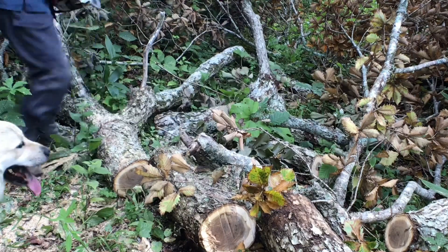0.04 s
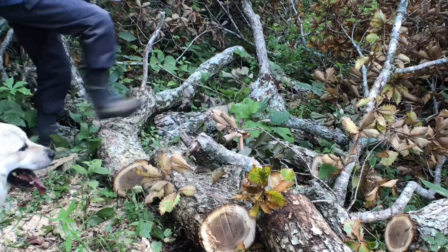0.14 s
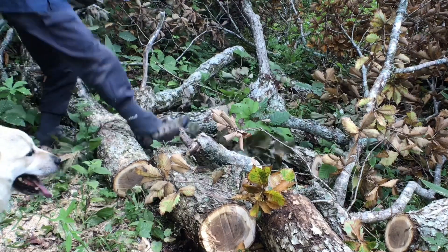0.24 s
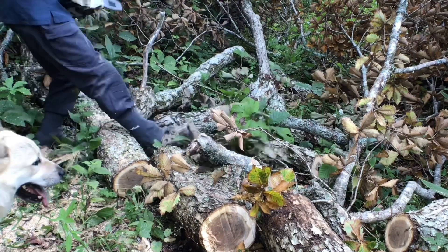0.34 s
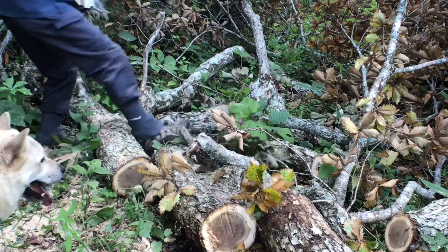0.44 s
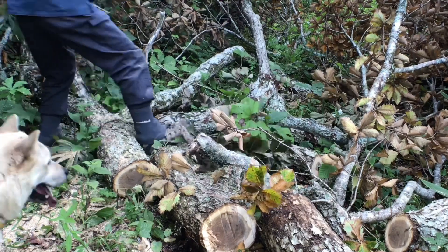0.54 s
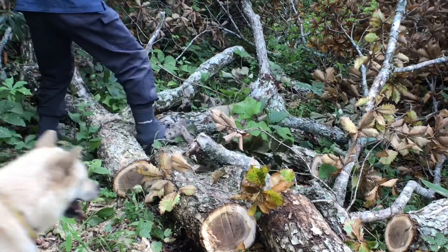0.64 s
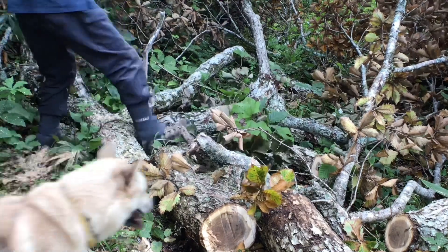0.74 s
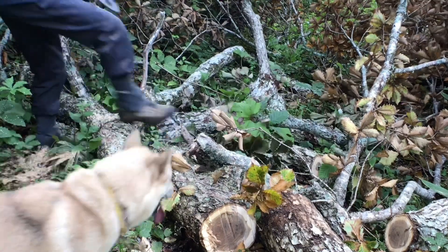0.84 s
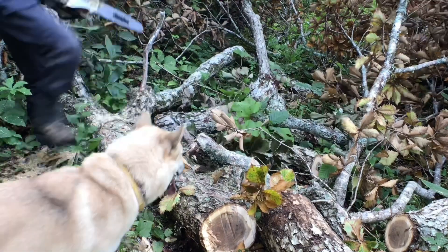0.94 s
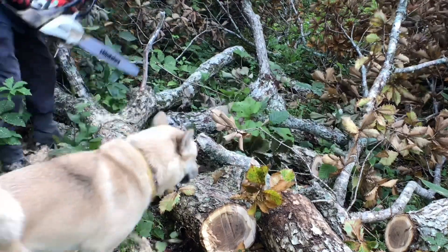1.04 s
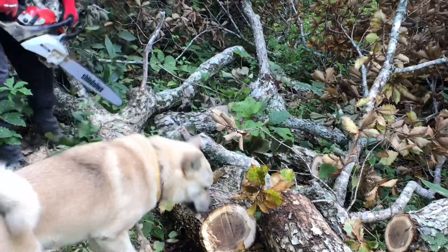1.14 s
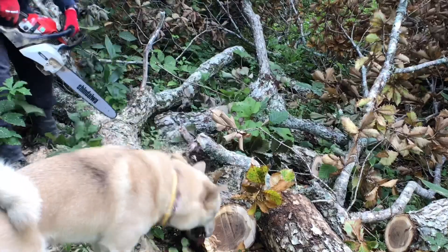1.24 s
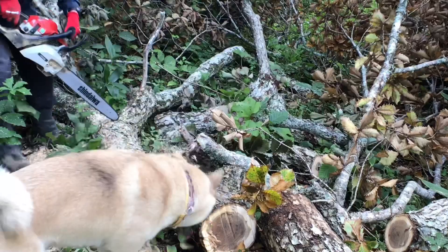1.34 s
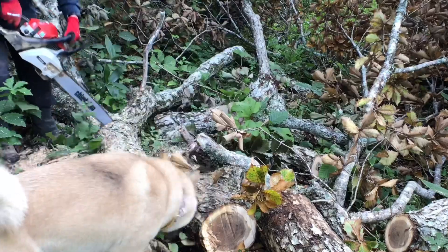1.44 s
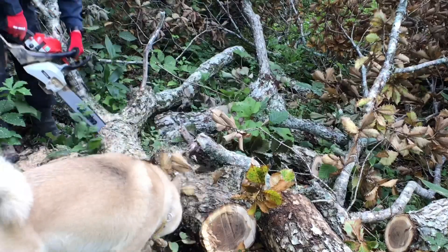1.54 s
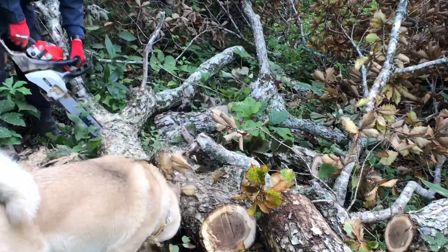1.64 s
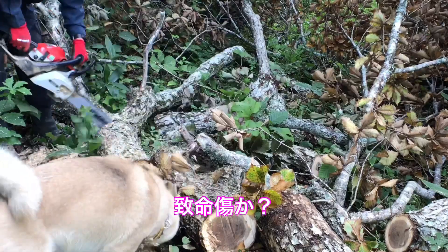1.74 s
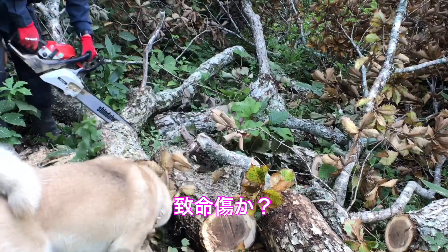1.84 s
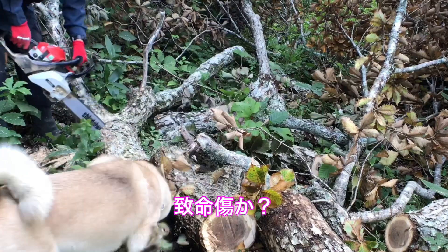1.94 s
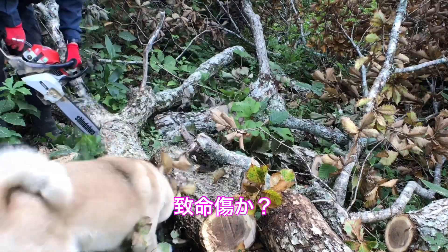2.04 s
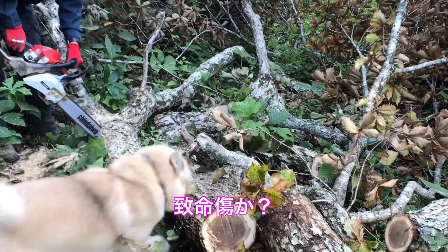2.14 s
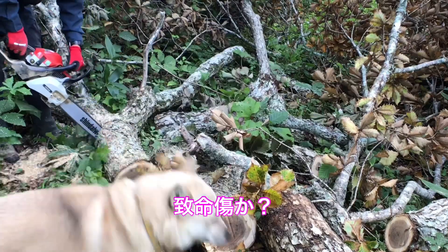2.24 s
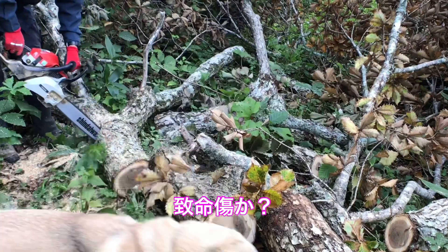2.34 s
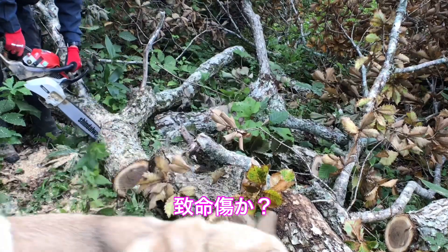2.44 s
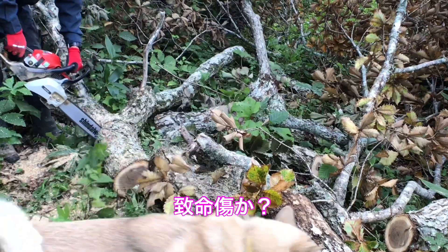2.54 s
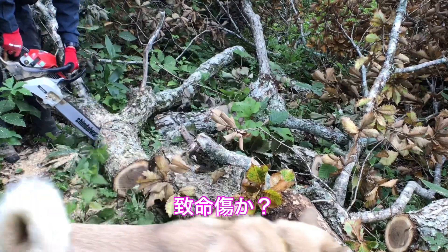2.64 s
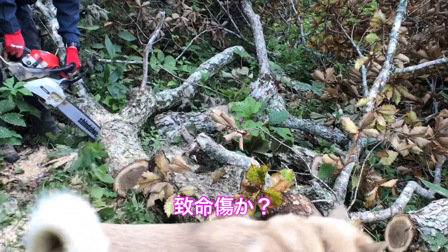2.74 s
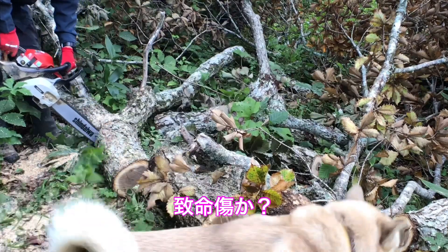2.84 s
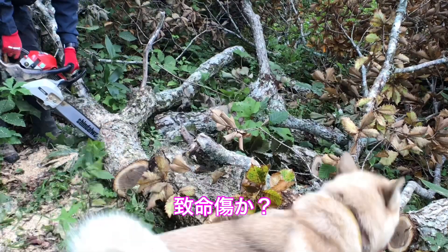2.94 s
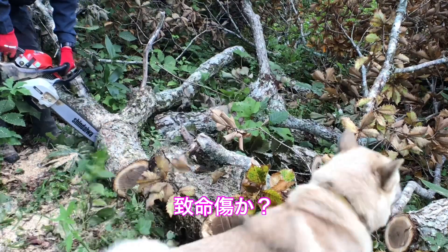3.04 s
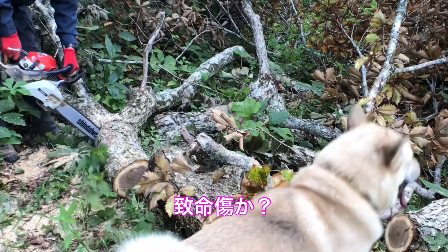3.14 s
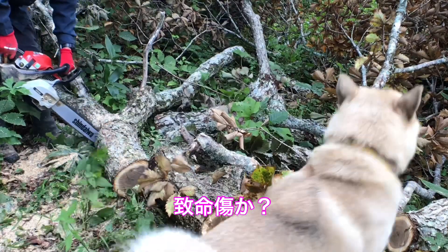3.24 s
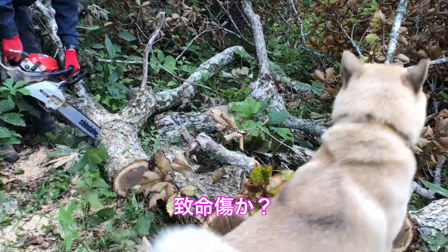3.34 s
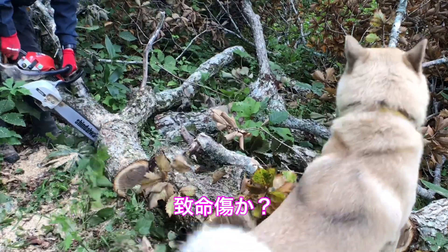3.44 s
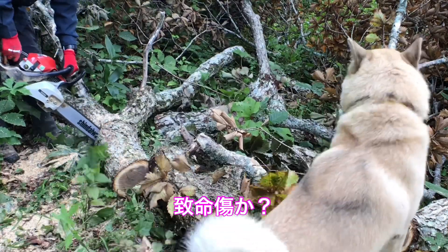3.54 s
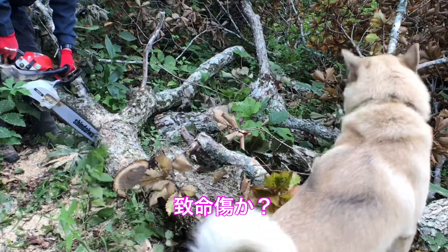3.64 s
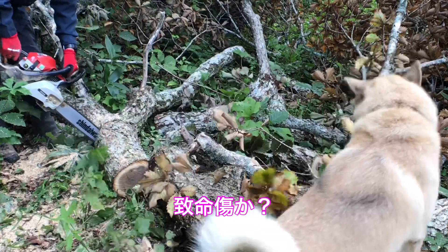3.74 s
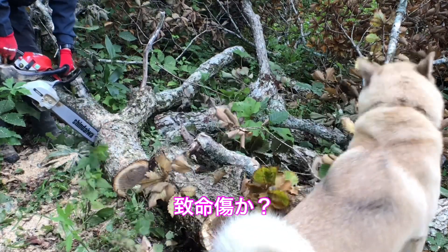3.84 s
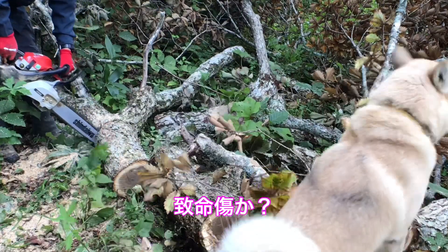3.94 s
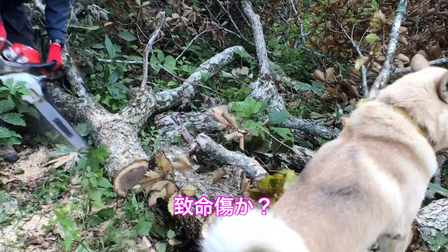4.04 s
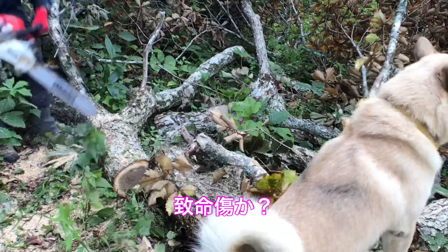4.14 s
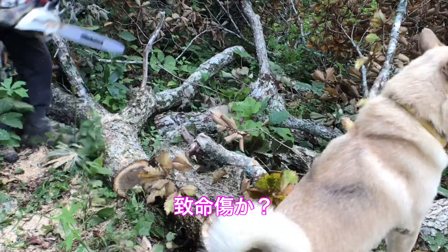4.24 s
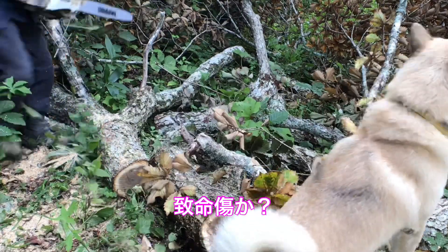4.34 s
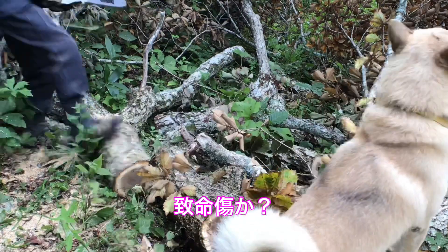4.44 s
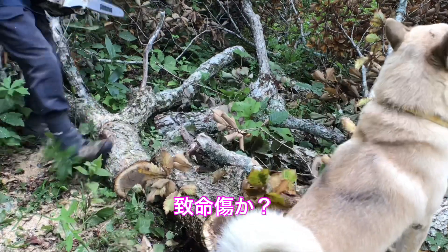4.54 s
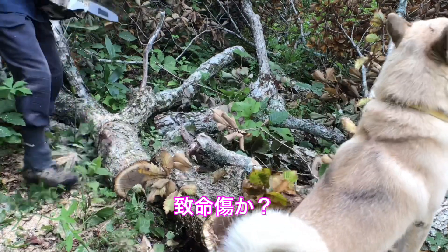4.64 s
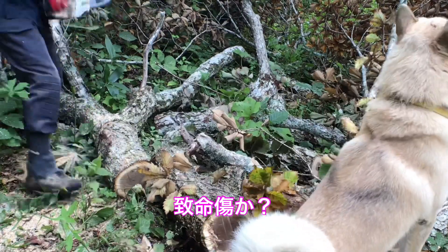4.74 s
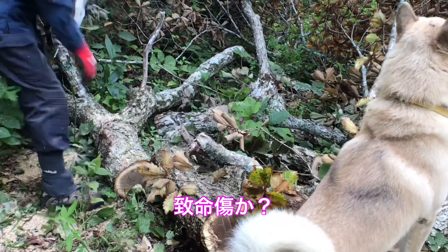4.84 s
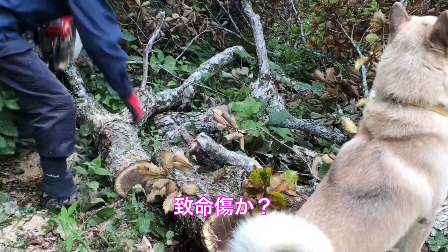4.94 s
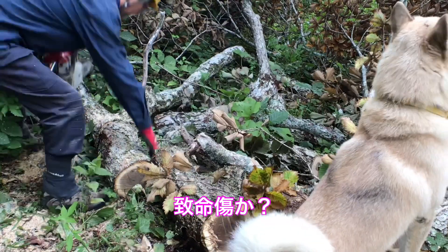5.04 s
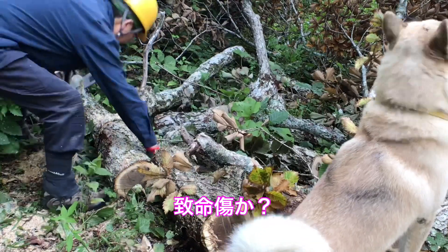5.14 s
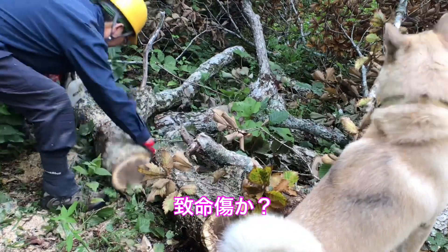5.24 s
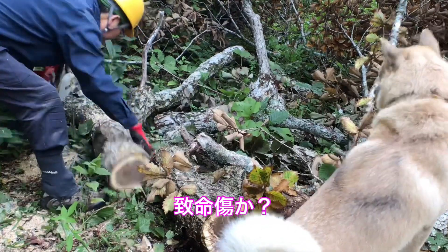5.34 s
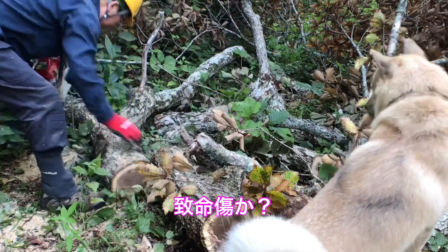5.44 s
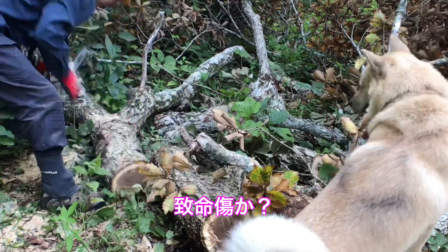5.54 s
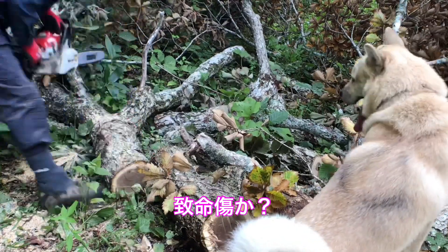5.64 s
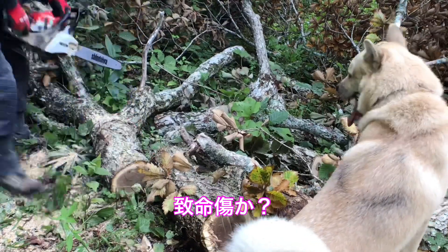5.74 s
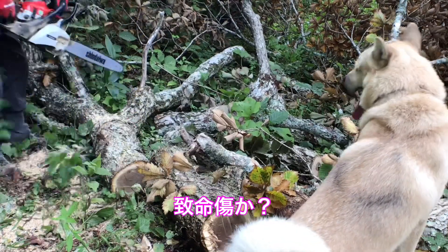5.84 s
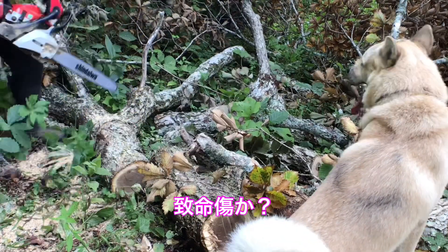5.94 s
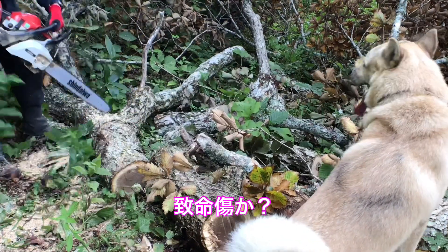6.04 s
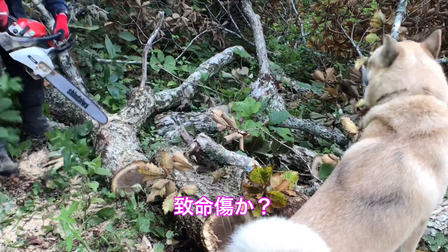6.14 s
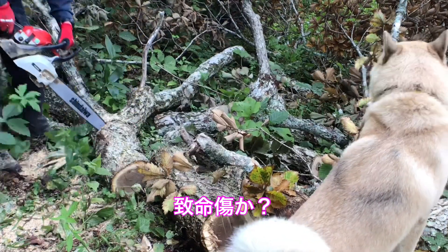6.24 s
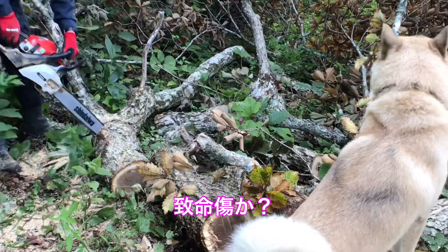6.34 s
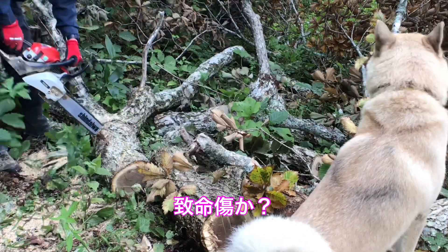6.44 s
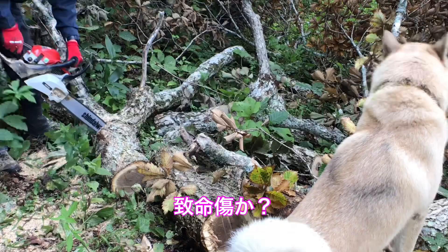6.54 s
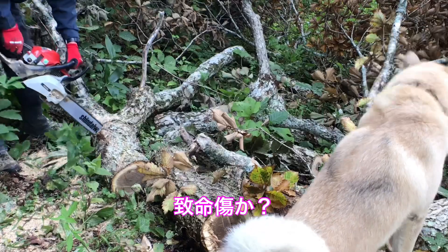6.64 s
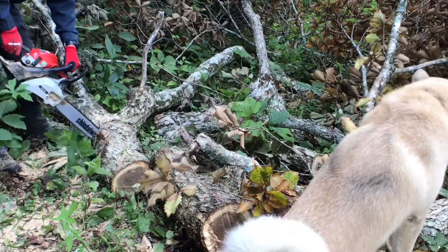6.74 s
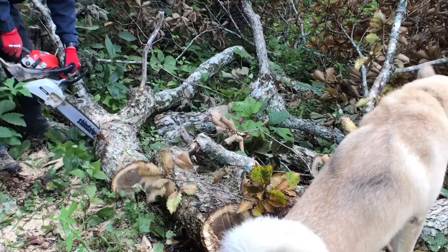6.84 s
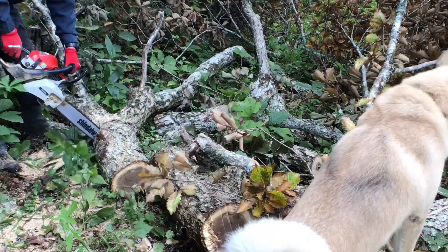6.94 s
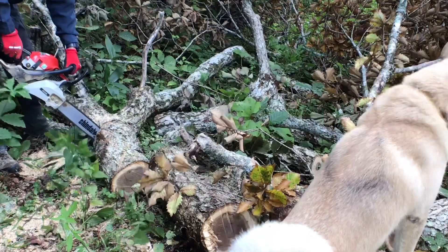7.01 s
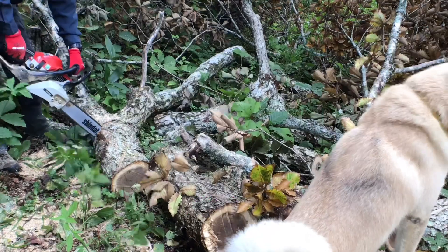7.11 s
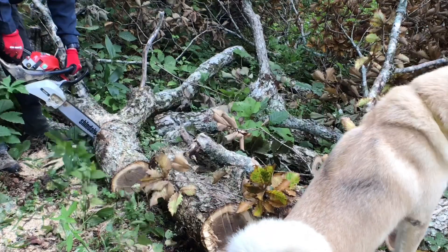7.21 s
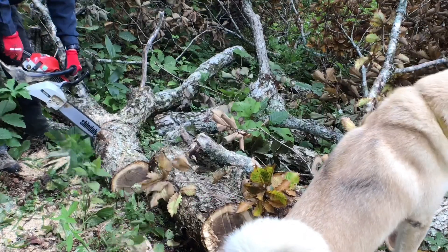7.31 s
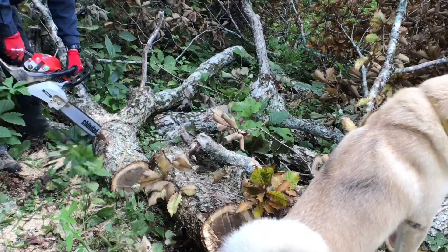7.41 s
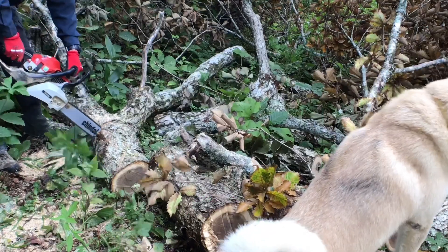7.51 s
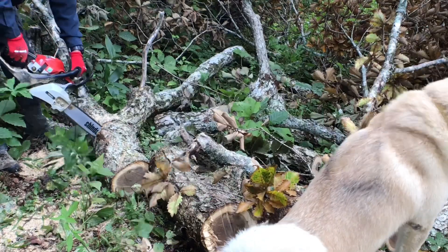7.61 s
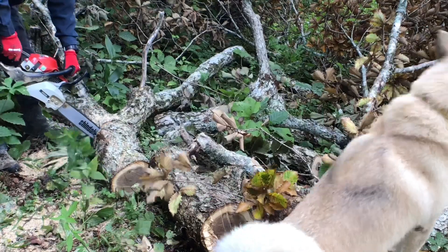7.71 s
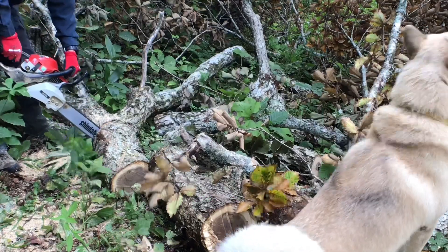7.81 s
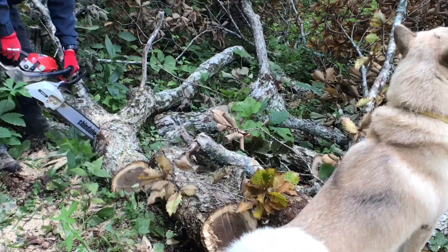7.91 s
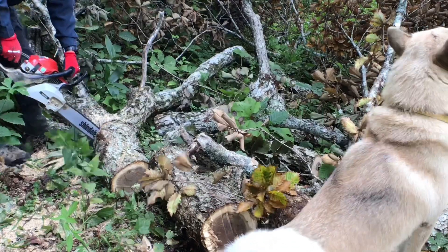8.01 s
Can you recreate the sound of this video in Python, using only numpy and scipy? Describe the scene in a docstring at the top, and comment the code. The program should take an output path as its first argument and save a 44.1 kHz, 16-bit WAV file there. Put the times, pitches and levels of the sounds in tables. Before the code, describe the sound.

A two-stroke chainsaw works outdoors a few metres from the microphone, everything about twice normal speed. From 0 to 1.7 s it idles in a rapid, uneven putter of pops and softer puffs, with rasp, metallic ring and slack chain rattle; the tone dulls and brightens as the saw is moved. At 1.7 s it opens up, whining briefly as it climbs to full speed by 2.1 s. Until about 4.2 s it holds a loud, buzzing scream with a rough growl beneath, pitch sagging and stumbling slightly under load. Released, it coasts smoothly down, reaching idle near 4.8 s. A muffled, lumpy putter follows, with sharper pops from about 5.2 s and brighter around 6.1 s. At 6.5 s it revs again, reaching a full growling scream by 6.85 s and holding it to the end around 8 s. Dry, centred sound with little deep bass.

```python
"""Chainsaw among felled logs

In a wood, a few metres from the microphone, one channel doubled; it all runs at about double speed.
A two-stroke saw idles with uneven pops, is opened up to cut, coasts down, idles and is opened up again.
Flat out, every third firing is the hard one, bar a few stumbles, which puts a growl under the scream.
One crank times exhaust pulses, a sine drone and whine, and filtered noise for rasp, ring and chain."""
import sys
import numpy as np
from scipy import signal
from scipy.fft import rfft, irfft
from scipy.io import wavfile
from scipy.ndimage import uniform_filter1d

SR = 44100
rng = np.random.default_rng(int(sys.argv[2]) if len(sys.argv) > 2 else 0)


def wav_out(sig):
    """Save sig, one row per channel (or a flat mono array), as 16-bit PCM at SR to the path in sys.argv[1]."""
    wavfile.write(sys.argv[1], SR, np.round(np.clip(np.atleast_2d(sig).T, -1, 1) * 32767).astype(np.int16))


N = 355887
T = np.arange(N) / SR  # t/s of every sample


def from_db(db):
    """Decibels to gain."""
    return 10 ** (np.asarray(db) / 20)


def in_time(rows):
    """One curve per column after t/s, its rows joined by straight lines."""
    t_s, *columns = np.transpose(rows)
    return [np.interp(T, t_s, column) for column in columns]


def ease(x, start, end):
    """Smooth step from 0 at start to 1 at end."""
    u = np.clip((x - start) / (end - start), 0, 1)
    return u * u * (3 - 2 * u)


def drift(per_s):
    """Slow chance with a spread near 1: random points joined by straight lines."""
    return np.interp(T * per_s, np.arange(N), rng.standard_normal(N))


def below(x, hz):
    """The part of x under a frequency, without delay."""
    return signal.sosfiltfilt(signal.butter(3, hz, fs=SR, output="sos"), x)


def coloured(x, spectrum, size=4096):
    """Causal (minimum-phase) filter with the given spectrum, built by folding its cepstrum."""
    hz, db = np.transpose(spectrum)
    bins_hz = np.fft.rfftfreq(size, 1 / SR)
    gain_db = np.interp(np.log(bins_hz + 1), np.log(hz), db)
    cepstrum = irfft(np.log(from_db(gain_db)))
    cepstrum[1:size // 2] *= 2
    cepstrum[size // 2 + 1:] = 0
    response = irfft(np.exp(rfft(cepstrum)))
    return signal.fftconvolve(x, response)[:N]


def resonance(x, hz, width_hz):
    """Two-pole resonance with gain 1 on top."""
    r = np.exp(-np.pi * width_hz / SR)
    zeros = np.array([1, 0, -1]) * (1 - r * r) / 2
    poles = [1, -2 * r * np.cos(2 * np.pi * hz / SR), r * r]
    return signal.lfilter(zeros, poles, x)


def at_level(x, db, band, size=3000):
    """Make the slow level of x within a band follow a dB curve."""
    in_band = signal.sosfilt(signal.butter(4, band, "band", fs=SR, output="sos"), x)
    slow_power = uniform_filter1d(uniform_filter1d(in_band ** 2, size), size)
    return x * from_db(db) / np.sqrt(np.abs(slow_power) + 1e-14)


def clicks(times, heights):
    """Band-limited clicks that may fall between samples."""
    at = times[:, None] * SR
    taps = np.floor(at).astype(int) + np.arange(-7, 9)
    shape = np.sinc(taps - at) * np.sinc((taps - at) / 8)
    return np.bincount(np.clip(taps, 0, N - 1).ravel(), (heights[:, None] * shape).ravel(), N)


def bursts(turns, peak_turn, depth_db, flicker_db):
    """Noise that swells once in each revolution, never twice alike."""
    swell_db = depth_db * np.cos(2 * np.pi * (turns - peak_turn))
    return rng.standard_normal(N) * from_db(swell_db + flicker_db * drift(220))


# each squeeze of the trigger: (opens t/s, clutch grips t/s, speed limit reached t/s, released t/s)
REVS = [(1.69, 1.77, 2.115, 4.18), (6.497, 6.555, 6.845, 8.2)]
# idle speed: (t/s, revolutions per s)
IDLE_SPEED = [(0, 103), (.35, 99.4), (.5, 97), (.8, 101.5), (1.05, 93), (1.3, 99), (1.5, 97), (1.62, 90),
              (1.7, 96), (4.8, 100), (4.95, 89.7), (5.35, 100), (6.0, 95.5), (6.12, 104), (6.5, 103)]
# speed flat out, sagging as the chain is pressed into the wood: (t/s, revolutions per s)
FIRST_CUT = [(2.12, 417.6), (2.32, 400.2), (2.64, 407.4), (2.7, 401.6), (2.87, 397.4), (3.05, 403.5),
             (3.36, 400.7), (3.42, 406.8), (3.52, 393.0), (3.59, 410.6), (3.7, 390.9), (3.8, 399.2),
             (3.83, 392.1), (4.17, 396.3)]
SECOND_CUT = [(6.85, 417.0), (6.88, 420.4), (6.96, 406.1), (7.152, 399.3), (7.31, 414.7), (7.442, 399.3),
              (7.524, 407.3), (7.86, 394.8), (8.06, 406.6)]
# the chain bites and loads the engine enough to fire evenly: (from t/s, to t/s)
BITES = [(3.53, 3.59)]
RACE_S, CLUTCH_REV_PER_S = .08, 211.3  # the free engine races up to the speed at which the clutch grips
SHUT_S, COAST_PER_S = 0.025, 2.38  # the throttle snaps shut; friction takes a steady share of the speed
OPEN_S, LIMIT_ONSET_S = 0.054, 0.024  # the throttle opens; the three-beat pattern sets in


def engine_state():
    """Speed, throttle 0-1 and speed limit 0-1: race to the clutch, haul the chain up to speed, cut, coast down."""
    idle, = in_time(IDLE_SPEED)
    flat_out, = in_time(list(FIRST_CUT) + list(SECOND_CUT))
    speed, throttle, limited = idle, np.zeros(N), np.zeros(N)
    for opens, grips, tops, released in REVS:
        race = (CLUTCH_REV_PER_S - idle) * ease(T, opens, opens + RACE_S)
        haul = (flat_out - CLUTCH_REV_PER_S) * ease(T, grips, tops)
        coast = np.exp(-COAST_PER_S * np.maximum(T - released, 0))
        speed = np.maximum(speed, (idle + race + haul) * coast)
        held = 1 - ease(T, released - SHUT_S / 2, released + SHUT_S / 2)
        throttle = throttle + held * ease(T, opens, opens + OPEN_S)
        limited = limited + held * ease(T, tops, tops + LIMIT_ONSET_S)
    for start, end in BITES:
        limited = limited * ((T < start) | (T > end))
    return speed, np.clip(throttle, 0, 1), limited


POP_RISE_S = .0015  # from the start of a pop to its peak


def crank(speed, waver=0.00223):
    """Revolutions turned so far; every loud pop falls on a whole revolution."""
    turns = np.cumsum(speed * (1 + waver * drift(70))) / SR
    pop_s = np.array(LOUD_POPS)[:, 0] + POP_RISE_S
    offset = np.unwrap(np.interp(pop_s, T, turns), period=1)
    return turns - np.interp(T, pop_s, offset)


# the saw is turned and carried behind its user and out again: (t/s, bass level/dB, treble level/dB)
FACING = [(0, -3, -2.5), (.75, -3, -6), (1.02, -1.5, -2.5), (1.26, 2, 1), (1.48, 0.5, 0), (1.63, 1.8, -2),
          (2.1, -1, 1.3), (2.9, -0.1, -0.35), (4.2, 0, -0.1), (4.72, -4.5, 0.4), (4.98, -3.5, -6),
          (5.27, 0.7, -5), (5.66, -1.2, -3), (5.8, -1.5, 1), (6.01, -0.6, -1.5), (6.1, 1.5, 1.5),
          (6.47, 1.5, 1), (6.7, -0.6, 0.7), (8.07, -0.2, -0.45)]
# target level of each part in its own band, before the parts are mixed:
# (level/dB at idle, dB per octave of speed, dB more on open throttle, dB more at the speed limit)
CHUG_LEVEL = (-31, 4, 9, 0)
DRONE_LEVEL = (-33.5, 3, 12.5, -1.53)
THUMP_LEVEL = (-38, 3, 3.5, 1.14)
BARK_LEVEL = (-34.5, 5, 2.35, -0.5)
RASP_LEVEL = (-41, 7, 2, 0.8)
RING_LEVEL = (-37, 2.5, -2, 0.5)
CHAIN_LEVEL = (-47, 7, 1.46, 1.2)
IDLE_REV_PER_S = 97  # the speed from which octaves count
BARK_TREBLE_SHARE, RING_TREBLE_SHARE = 0.7, 1.5  # how much these parts follow the treble
HISS_WAVER_DB, BARK_WAVER_DB, WAVERS_PER_S = 0.65, 1, 12
RING_WAVER_DB, RING_WAVERS_PER_S = 2, 9
PURE_REV_PER_S, PURE_DB = (308, 363), -7  # fast even firing loses its thump over these speeds
# the first firings on open throttle are extra hard, fading over these speeds; share heard in the treble
GULP_DB, GULP_REV_PER_S, GULP_TREBLE_SHARE = 4, (160, 218), 0.97


def loudness(speed, throttle, limited, size=900):
    """Levels in dB of chug, drone, thump, bark, rasp, ring and chain, from engine state and how the saw faces."""
    bass_db, treble_db = in_time(FACING)
    at_limit = uniform_filter1d(limited, size)
    state = np.array([np.ones(N), np.log2(speed / IDLE_REV_PER_S), throttle, at_limit])
    pure = ease(speed, *PURE_REV_PER_S) * throttle * (1 - at_limit)
    gulp_db = GULP_DB * throttle * (1 - ease(speed, *GULP_REV_PER_S))
    treble_db = treble_db + GULP_TREBLE_SHARE * gulp_db + HISS_WAVER_DB * drift(WAVERS_PER_S)
    bark_waver_db = BARK_WAVER_DB * drift(WAVERS_PER_S)
    ring_waver_db = RING_WAVER_DB * drift(RING_WAVERS_PER_S)
    return (np.dot(CHUG_LEVEL, state) + bass_db + gulp_db,
            np.dot(DRONE_LEVEL, state) + bass_db,
            np.dot(THUMP_LEVEL, state) + bass_db + gulp_db + PURE_DB * pure,
            np.dot(BARK_LEVEL, state) + BARK_TREBLE_SHARE * treble_db + bark_waver_db,
            np.dot(RASP_LEVEL, state) + treble_db,
            np.dot(RING_LEVEL, state) + RING_TREBLE_SHARE * treble_db + ring_waver_db,
            np.dot(CHAIN_LEVEL, state) + treble_db)


# colour of the chain hiss: (f/Hz, relative level/dB)
CHAIN = [(2000, -12), (5000, -13), (7000, 7), (7700, 0), (9500, -1.5), (11600, 1.5), (13500, -5),
         (15000, -21), (16000, -58)]
RATTLE_DB = 2.2  # at idle the slack chain rattles unevenly, by this much


def chain_hiss(turns, revved, chain_db):
    """The links hiss as noise swelling with each revolution, rattling unevenly when slack."""
    links = coloured(bursts(turns, peak_turn=-0.17, depth_db=2.0, flicker_db=0.97), CHAIN)
    rattle = from_db(RATTLE_DB * (1 - revved) * drift(300))
    return at_level(links * rattle, chain_db, (7500, 14000))


# the sprocket's whine: (multiple of the crank speed, level/dB)
WHINE_ORDERS = [(7, -36), (8, -24.5)]
WHINE_REV_PER_S, WHINE_WAVER_DB = (250, 320), 0.5  # it sets in over these speeds


def sprocket(turns, speed):
    """The drive sprocket's teeth whine, as sines, while they haul the chain up to the speed limit."""
    hauling, whine = 0, 0
    for _, grips, tops, _ in REVS:
        hauling = hauling + (T > grips) * (1 - ease(T, (grips + tops) / 2, tops) ** 4)
    for multiple, db in WHINE_ORDERS:
        gain = from_db(db + WHINE_WAVER_DB * drift(40))
        whine = whine + gain * np.sin(2 * np.pi * round(multiple) * turns)
    return hauling * ease(speed, *WHINE_REV_PER_S) * whine


# ringing of the clutch drum and bar: (f/Hz, width/Hz, relative level/dB)
METAL = [(5276, 67, 1), (5430, 99, 6), (6780, 40, -2), (8140, 96, -6.5), (8830, 57, -6.5)]


def metal_ring(turns, ring_db):
    """The piston knocks shortly before the port opens and sets the resonant metal ringing."""
    knocks = bursts(turns, peak_turn=-0.2, depth_db=11.0, flicker_db=4.0)
    metal = sum(from_db(db) * resonance(knocks, hz, width) for hz, width, db in METAL)
    return at_level(metal, ring_db, (5100, 5800))


# the housing buzzing with each firing: (f/Hz, relative level/dB)
BUZZ = [(1500, -44), (2400, 10), (2800, -16), (3250, 0.5), (3800, 5.5), (4600, 2.5), (5500, 4.5),
        (6100, 0.5), (6600, -8), (7100, -5), (8000, -27), (14000, -23)]


def housing(kicks, decay_s=0.01, shift=0.87, size=700):
    """Each firing shakes a dense cluster of short modes; their balance shifts as the saw is pressed and turned."""
    responses = rng.standard_normal((2, size)) * np.exp(-T[:size] / decay_s)
    one, other = signal.fftconvolve(kicks[None], responses)[:, :N]
    angle = shift * drift(9)
    return coloured(np.cos(angle) * one + np.sin(angle) * other, BUZZ)


CRACK_SHARE, CRACK_S = 1, 0.0037  # a loud pop lifts the gas rasp: share of its excess in dB, decay


def cracks():
    """Lift in dB of the gas rasp after each loud pop."""
    pop_s, pop_db = np.transpose(LOUD_POPS)
    at = ((pop_s + POP_RISE_S) * SR).astype(int)
    lifts = np.bincount(at, CRACK_SHARE * (pop_db - UNFIRED_DB), N)
    return signal.lfilter([1], [1, -np.exp(-1 / (CRACK_S * SR))], lifts + 1e-18)


# colour of the gas rasp: (f/Hz, relative level/dB)
RASP = [(40, -44), (130, -19.5), (500, -12), (1000, -13.5), (1300, -7), (1750, -1.5), (2700, -1.5),
        (4000, -3.5), (5000, -1.5), (6100, -4.5), (7500, -19), (12000, -33)]


def gas_rasp(turns, revved, rasp_db):
    """Turbulent gas rasps as noise in time with the crank, with a brief crack after each loud pop."""
    noise = bursts(turns, peak_turn=-0.13, depth_db=4.5, flicker_db=0.0)
    gas = coloured(noise * from_db(cracks()), RASP)
    return from_db(-2.0 - 2.35 * revved) * at_level(gas, rasp_db, (2800, 4800))


def gas_drone(turns, revved, drone_db):
    """The muffler smooths the gas flow into a fundamental that dominates at speed."""
    return -revved * from_db(drone_db) * np.cos(2 * np.pi * (turns - .04))


# the loudest pops at idle: (t/s, level/dB among the firings, before contrast and levelling)
LOUD_POPS = [(0.201, -11.5), (0.282, -10), (0.408, -12.5), (0.543, -8), (0.808, -9), (1.154, -12),
             (1.237, -11), (1.276, -11), (1.317, -10.5), (1.357, -11), (1.42, -9), (1.491, -9.5),
             (1.695, -10.5), (5.242, -10), (5.539, -13), (5.6, -11), (5.711, -17), (5.802, -10.5),
             (6.063, -9), (6.102, -9), (6.188, -9), (6.227, -10), (6.316, -10), (6.344, -9), (6.511, -10)]
UNFIRED_DB, POP_DB, POP_SCATTER_DB = -16.5, -13.5, 0.7  # mere puffs; the other pops, on the same scale
LONG_WAIT_SHARE = .35  # share of pops followed by a wait of four revolutions, not three
RESTART_S = .82  # none of the other pops for this long after the trigger is released


def idle_firings(port_s, chance, scatter_db=1.0):
    """Level in dB of each revolution at idle: most only puff; every third or fourth one fires with a pop."""
    level_db = UNFIRED_DB + scatter_db * chance[:, 0]
    loud = {np.argmin(np.abs(port_s - s)): db for s, db in LOUD_POPS}
    waits = 3 + (rng.random(N) < LONG_WAIT_SHARE)
    coasting = np.any([(port_s > released) & (port_s < released + RESTART_S) for *_, released in REVS], axis=0)
    due = 0
    for k in range(len(port_s)):
        # an ordinary pop gives way to a loud one just ahead
        room = k + 1 not in loud and k + 2 not in loud
        if k in loud or (k >= due and not coasting[k] and room):
            level_db[k] = loud.get(k, POP_DB + POP_SCATTER_DB * chance[k, 0])
            due = k + waits[k]
    return level_db


def idle_kicks(port_s, speed, chance, level_db, wobble_s=0.00022):
    """One kick per revolution; a slow crank turns unevenly, and a fast one evens the pops out."""
    slowness = (speed[0] / np.interp(port_s, T, speed)) ** 2
    mean_db = level_db.mean()
    kick_db = mean_db + slowness * (level_db - mean_db)
    return clicks(port_s + wobble_s * chance[:, 2] * slowness, -from_db(kick_db))


# exhaust pulse at idle: (f/Hz, relative level/dB)
IDLE_PULSE = [(50, -29), (75, -19.5), (100, 5.5), (190, 6.5), (300, 6.5), (500, 3), (750, -2), (1400, 2),
              (2000, -7.5), (2800, -6), (3400, -33.5), (7000, -18.5), (15000, -50)]
# the ground echo changes as the saw is carried about: (t/s, delay/ms)
GROUND = [(0, 1.01), (.85, 0.89), (1.1, 0.99), (1.5, 1.56), (4.2, 1.6), (4.45, 0.95), (5.0, 0.94),
          (5.25, 0.53), (5.55, 0.49), (5.85, 0.76), (6.05, 1.52), (6.5, 1.67)]
GUSH_S, GUSH_SHARE = .0025, .085  # decay of the gush; its share at the opening idle speed
CAN_HZ, CAN_WIDTH_HZ, CAN_DB = 825, 75, 0  # at idle the muffler can rings after each puff


def idle_exhaust(port_s, speed, chance, echo=0.53, chug_contrast=1.4, putter_contrast=1.0):
    """A low chug, carried mostly by the pops, and an evener putter that the ground echoes."""
    level_db = idle_firings(port_s, chance)
    chug = coloured(idle_kicks(port_s, speed, chance, chug_contrast * level_db), IDLE_PULSE)
    kicks = idle_kicks(port_s, speed, chance, putter_contrast * level_db)
    # a short gush of turbulent gas follows each kick
    flow = signal.lfilter([1], [1, -np.exp(-1 / (GUSH_S * SR))], kicks)
    gush = flow * rng.standard_normal(N)
    puffs = coloured(kicks + GUSH_SHARE * gush * (speed[0] / speed) ** 2, IDLE_PULSE)
    puffs = puffs + from_db(CAN_DB) * resonance(puffs, CAN_HZ, CAN_WIDTH_HZ)
    delay_ms, = in_time(GROUND)
    puffs = puffs + echo * np.interp(T - delay_ms / 1000, T, puffs)
    return below(chug, 450), puffs - below(puffs, 450)


# the three-beat pattern stumbles by one revolution: (t/s)
STUMBLES = [2.18, 2.271, 2.36, 2.92, 3.44, 3.64, 3.85, 7.07, 7.29, 7.53, 7.82, 8.04]
SOFT_BEAT_DB = -13.0  # against the hard beat


def firings(port_s, limited, chance, scatter_db=0.32, jitter_s=.000007, even_db=-4.5):
    """Every revolution fires evenly until the speed limit; there one hard beat alternates with two soft ones."""
    beat = np.arange(len(port_s)) - np.searchsorted(np.sort(STUMBLES), port_s)
    beat_db = np.where(beat % 3 == 0, 0, SOFT_BEAT_DB)
    at_limit = np.interp(port_s, T, limited)
    level_db = at_limit * beat_db + (1 - at_limit) * even_db + scatter_db * chance[:, 1]
    return clicks(port_s + jitter_s * chance[:, 2], -from_db(level_db))


# exhaust pulse at high speed: (f/Hz, relative level/dB)
FAST_PULSE = [(50, -17), (130, -2), (400, -2), (560, 2), (800, -4), (940, -15.5), (1230, -9), (1480, 3),
              (1720, 2.5), (1870, 0), (2050, 2), (2480, -11.5), (2800, -13.5), (14000, -88)]
# muffler chambers: (f/Hz, width/Hz)
CHAMBERS = [(1550, 198), (2050, 740)]
# modes of the outlet: (f/Hz, width/Hz, level/dB against the pulses)
OUTLET = [(2500, 110, 9), (3280, 200, 16)]


def fast_exhaust(kicks):
    """Hard pulses, briefly held back and smeared by chambers; harmonics whine as they meet the outlet's modes."""
    pulses = coloured(kicks, FAST_PULSE)
    for hz, width in CHAMBERS:
        pulses = pulses - 2 * resonance(pulses, hz, width)  # allpass: delays, keeps the colour
    return pulses + sum(from_db(db) * resonance(pulses, hz, width) for hz, width, db in OUTLET)


def muffler(pulses, thump_db, bark_db):
    """The pulses leave as a low thump and a hard bark."""
    low = below(pulses, 1000)
    thump = at_level(low, thump_db, (480, 880))
    return thump + at_level(pulses - low, bark_db, (1100, 2600))


# coasting, the scream gives way to the putter over these speeds; its share above them
COAST_REV_PER_S, COAST_SCREAM = (181, 260.6), 0.51


def scene():
    """The crank drives exhaust, housing buzz, gas rasp, metal ring and chain together."""
    speed, throttle, limited = engine_state()
    chug_db, drone_db, thump_db, bark_db, rasp_db, ring_db, chain_db = loudness(speed, throttle, limited)
    revved = np.clip((speed - 108) / 65, 0, 1)  # 0 at idle, 1 from 173 revolutions per s
    turns = crank(speed)
    # the exhaust port opens once per revolution
    port_s = np.interp(np.arange(np.ceil(turns[0]), turns[-1]), turns, T)
    # chance of each revolution: idle level, fast level, timing
    chance = rng.standard_normal((4000, 3))[:len(port_s)]
    kicks = firings(port_s, limited, chance)

    chain = chain_hiss(turns, revved, chain_db)
    whine = sprocket(turns, speed)
    ring = metal_ring(turns, ring_db)
    buzz = from_db(-3.5) * revved * at_level(housing(kicks), rasp_db, (2800, 4800))
    rasp = gas_rasp(turns, revved, rasp_db)
    drone = gas_drone(turns, revved, drone_db)

    chug, puffs = idle_exhaust(port_s, speed, chance)
    chug = at_level(chug, chug_db, (70, 450))
    putter = muffler(puffs, thump_db, bark_db)
    scream = muffler(fast_exhaust(kicks), thump_db, bark_db)
    coasting = COAST_SCREAM * ease(speed, *COAST_REV_PER_S)
    screaming = np.clip(np.maximum(throttle, coasting), 0, 1)
    exhaust = np.sqrt(1 - screaming) * putter + np.sqrt(screaming) * scream + (1 - revved) * chug
    return np.tile(chain + whine + ring + buzz + rasp + drone + exhaust, (2, 1))


def record(dry, low_cut_hz=55, top_hz=15750):
    """The microphone's sound, alike in both channels, without deep bass and cut off steeply at the top."""
    thin = signal.sosfilt(signal.butter(2, low_cut_hz, "high", fs=SR, output="sos"), dry)
    return signal.sosfilt(signal.ellip(12, .1, 90, top_hz, fs=SR, output="sos"), thin)


dry = scene()
out = record(dry)
wav_out(out)
```